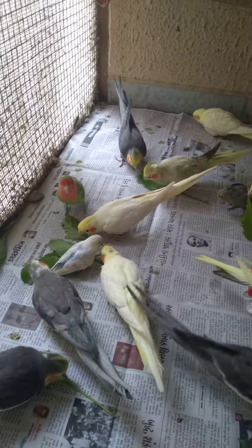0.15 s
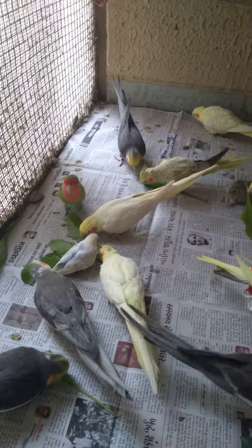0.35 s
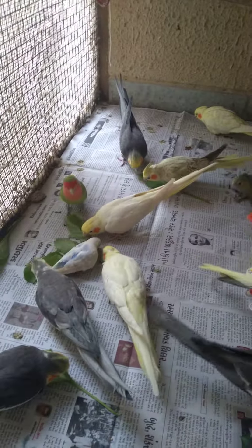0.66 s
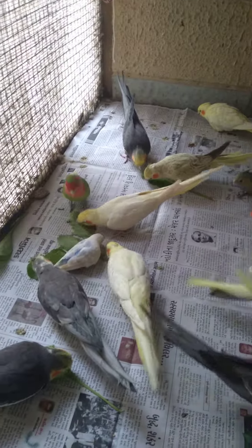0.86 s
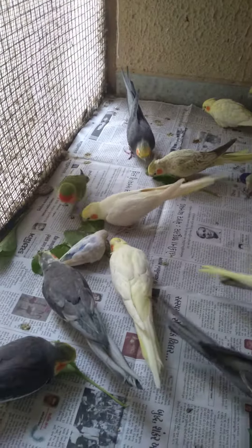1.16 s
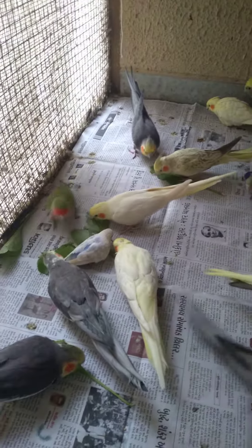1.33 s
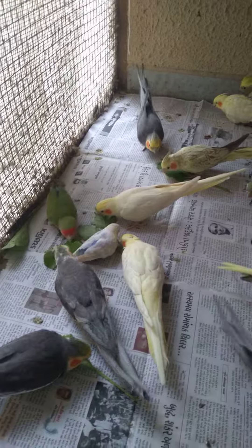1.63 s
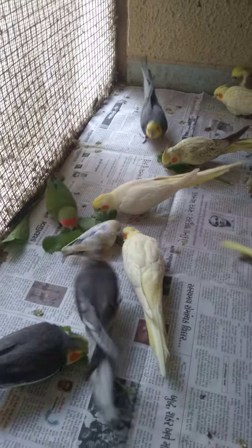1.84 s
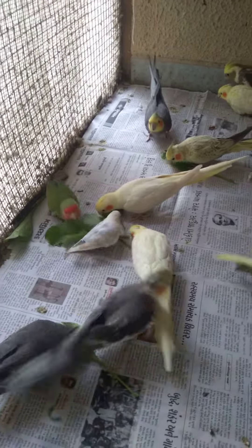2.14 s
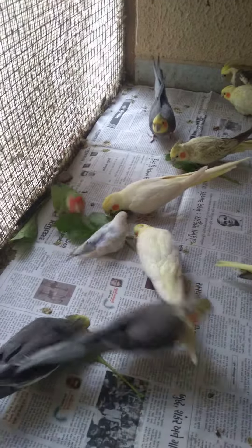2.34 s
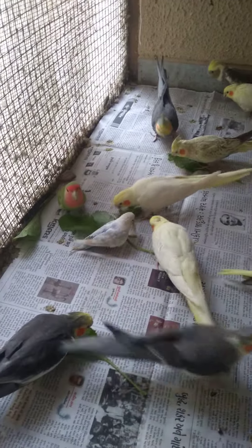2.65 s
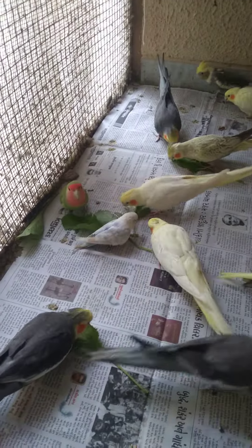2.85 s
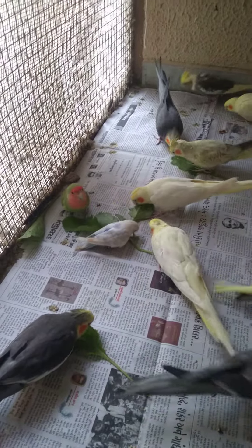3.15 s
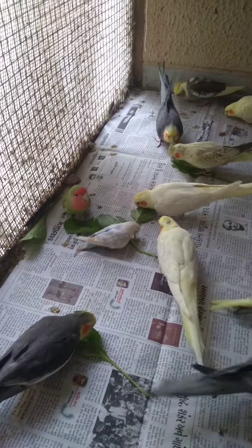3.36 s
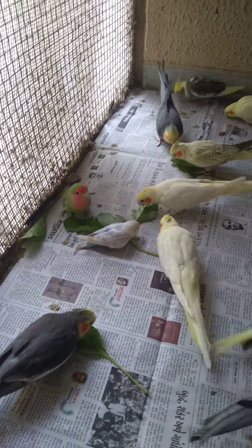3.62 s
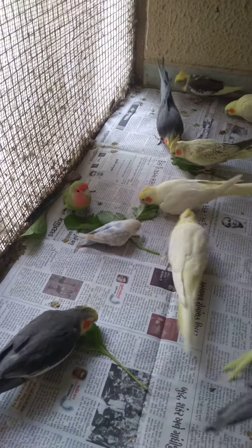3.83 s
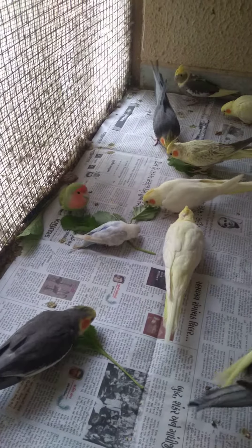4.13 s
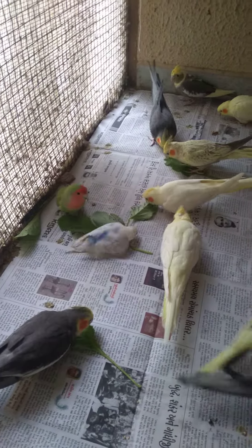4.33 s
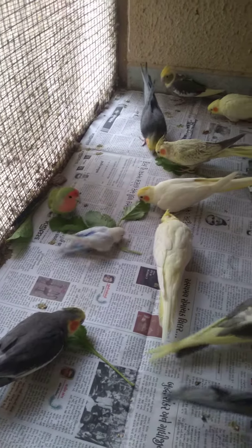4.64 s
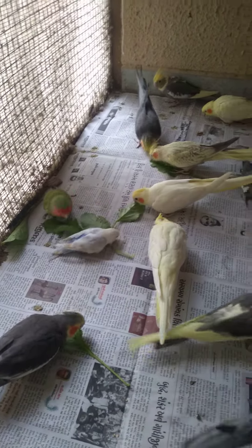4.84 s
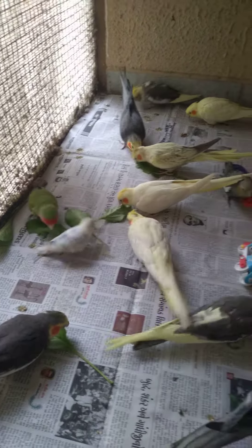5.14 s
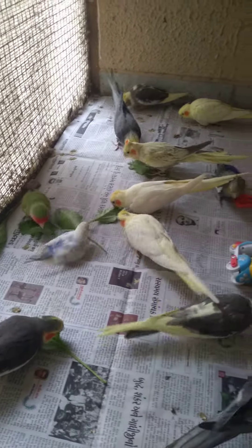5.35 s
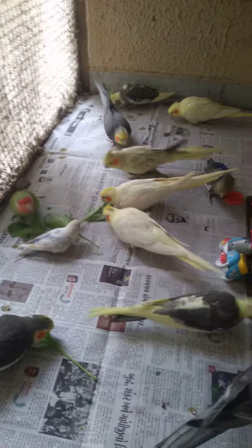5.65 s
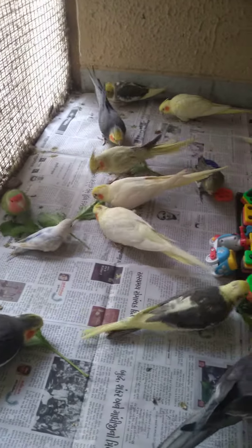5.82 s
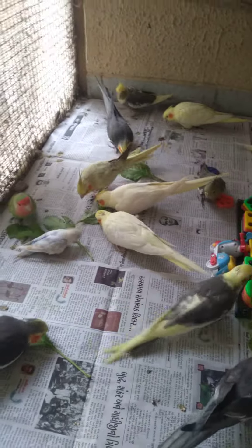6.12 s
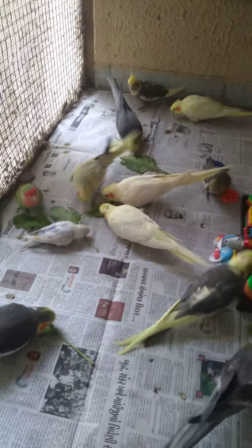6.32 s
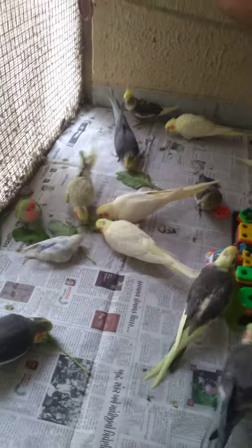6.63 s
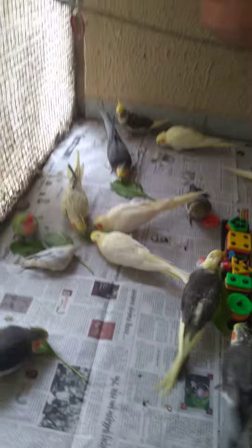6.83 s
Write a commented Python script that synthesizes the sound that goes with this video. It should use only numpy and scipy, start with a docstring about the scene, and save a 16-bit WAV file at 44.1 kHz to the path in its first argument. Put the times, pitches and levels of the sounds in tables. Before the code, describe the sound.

Close beak snips and papery rustling from feeding cockatiels in a hard-walled aviary, broken by brief bird calls and hollow floor knocks.

```python
"""A flock of small parrots feeds in a hard-walled aviary, close to the stereo microphone, for about 7 s.
Throughout, beaks snip leaves in noise bursts, claws crinkle paper in noise grains; a suppressor dulls the gaps.
A voice model of gliding tone and rasp gives an arched screech at once, chirps from 1 s, a harsh squawk at 2.4 s.
Knocks ring the hollow floor's modes, hardest near 3.7 and 4.1 s; at 6.3 s a whistle climbs in steps.
Under it all lie shaped noise for a deep outdoor rumble and faint air, and sines for a motor's hum."""
import sys
import numpy as np
from scipy import signal
from scipy.fft import rfft, irfft, next_fast_len
from scipy.io import wavfile
from scipy.ndimage import uniform_filter1d, map_coordinates

SR = 44100
rng = np.random.default_rng(int(sys.argv[2]) if len(sys.argv) > 2 else 0)


def dump(signal):
    """Clip the signal to [-1, 1] and save it as 16-bit WAV at the path in sys.argv[1]."""
    limited = np.clip(np.atleast_2d(signal).T, -1, 1)
    pcm = np.round(limited * 32767).astype(np.int16)
    wavfile.write(sys.argv[1], SR, pcm)


N = 307818  # length in samples


def amp(db):
    """Decibels to gain."""
    return 10 ** (np.asarray(db) / 20)


def unit(x):
    """Scale to rms 1."""
    return x / np.sqrt(np.mean(x ** 2) + 1e-20)


def along(points, hz):
    """Read (f/Hz, value) points at the frequencies hz, on a log axis."""
    f, value = np.transpose(points)
    return np.interp(np.log(hz + 1), np.log(f + 1), value)


def curves(rows, t):
    """Each column after the time, read at the times t."""
    times, *columns = np.transpose(rows)
    return [np.interp(t, times, column) for column in columns]


def wobble(rate, size):
    """A smooth random curve, rate knots a second."""
    knots = rng.standard_normal(int(size * rate / SR) + 4)
    return map_coordinates(knots, [np.arange(size) * rate / SR])


def filtered(x, response):
    """x times a response of frequency."""
    size = x.shape[-1]
    padded = next_fast_len(size + 4096)
    spectrum = rfft(x, padded) * response(np.fft.rfftfreq(padded, 1 / SR))
    return irfft(spectrum, padded)[..., :size]


def coloured(x, spectrum):
    """x through a spectrum, at rms 1."""
    return unit(filtered(x, lambda hz: amp(along(spectrum, hz))))


def pair(size, side_db):
    """Two channels of white noise that share a common part."""
    mid, side = rng.standard_normal((2, size))
    side = amp(side_db) * side
    return unit(np.array([mid + side, mid - side]))


def placed(x, pan_db, lag):
    """Louder on the left by pan_db and earlier there by lag samples."""
    sign = np.array([[.5], [-.5]])
    return filtered(x, lambda hz: amp(sign * pan_db) * np.exp(2j * np.pi * hz * sign * lag / SR))


def add(track, s, x):
    """Mix x into the track from s seconds on."""
    start = max(round(s * SR), 0)
    part = x[:, :max(N - start, 0)]
    track[:, start:start + part.shape[1]] += part


def grains(rate, spread_db, life):
    """Envelope of tiny fractures, rate a second, each dying over life seconds, a few much larger than the rest."""
    chance = rng.random(N)
    size = np.minimum(rng.exponential(size=N), 3.5)
    energy = (chance < rate / SR) * amp(spread_db * size) ** 2
    decaying = signal.lfilter([1], [1, -np.exp(-2 / (life * SR))], energy)
    return unit(np.sqrt(decaying))


# how long the aviary walls ring: (f/Hz, t60/s)
WALL_RING = [(200, .35), (1000, .42), (2600, .35), (4000, .38), (8000, .34), (15000, .2)]


def aviary(x, wet_db):
    """Direct sound plus the walls' answer: stereo noise dying at its own rate in each band, new on every call."""
    hz, t, bands = signal.stft(pair(SR // 2, side_db=1.5), SR, nperseg=256)
    decay = amp(-60 * t / along(WALL_RING, hz)[:, None])
    onset = 1 - np.exp(-t / 0.00043)
    tail = signal.istft(bands * decay * onset, SR, nperseg=256)[1]
    out = amp(wet_db) * signal.fftconvolve(x, tail / np.linalg.norm(tail[0]), axes=1)
    out[:, :x.shape[1]] += x
    return out


# the loudest snips of beaks and claws: (t/s, nominal direct peak level/dB, f/Hz, left-right level/dB)
SNIPS = [(.1099, -31, 3700, -4.5), (.2674, -43.5, 4050, 5.5), (.3947, -39.5, 8100, 1.5),
         (.4236, -40, 2460, 4.5), (.7789, -49, 5430, 10), (1.1761, -42.5, 2060, -2),
         (1.253, -40.5, 4350, -4), (1.398, -42, 5700, -1), (1.5075, -38, 3550, -3.5),
         (1.6312, -45, 3340, 6), (1.8453, -47.5, 4920, -1), (1.904, -44.5, 2010, 0),
         (2.0027, -40.5, 4580, 6), (2.0835, -31.5, 5870, 1.5), (2.2322, -39.5, 7290, -2),
         (2.2865, -40.5, 4870, 7), (2.39, -39.5, 6050, 1), (2.6432, -38, 5230, 1), (2.6967, -42.5, 7900, 8),
         (2.7111, -41, 6400, 11), (2.786, -43, 4640, 4), (3.0045, -45.5, 4840, 5.5), (3.039, -44, 3930, 12),
         (3.5306, -40.5, 7500, 3.5), (3.6992, -32.5, 2630, 3.5), (3.8385, -38.5, 3150, 4),
         (3.8726, -35, 2620, 4), (4.0488, -37.5, 2600, 4), (4.08, -34.5, 2700, -5), (4.1894, -37, 8000, 4),
         (4.3934, -41, 8720, -5), (4.4197, -38, 6400, 5.5), (4.4472, -35, 8300, 0.5),
         (4.6432, -33.5, 4900, -.5), (4.6494, -36, 3330, -3.5), (4.7522, -35, 3390, -1),
         (4.796, -37.5, 8700, 0), (4.8868, -34.5, 9060, -2), (4.8933, -36.5, 3900, -2),
         (5.3776, -41, 7400, 5.5), (5.5267, -42.5, 7800, 4), (5.596, -42.5, 3990, -1),
         (5.6548, -45.5, 8900, -6), (5.7335, -33, 4500, 3), (5.7934, -38.5, 4480, 1),
         (6.502, -39.5, 2270, -1), (6.8127, -38, 3870, 6)]
# spectrum of a beak snip, before its own ring: (f/Hz, relative level/dB)
BEAK_SPECTRUM = [(300, -10), (1500, -6), (3000, -1.5), (6000, 2.5), (9000, 4), (10800, -10), (13000, -14.5),
                 (16000, -26.5)]


def snips():
    """A leaf gives way in one sharp snap and a few smaller tears, ringing around its own pitch."""
    out, t = np.zeros((2, N)), np.arange(SR // 25) / SR
    for s, db, pitch_hz, pan_db in [*SNIPS, *nibbles(count=32)]:
        after = t - rng.uniform(0.0053, 0.0056, (3, 1))
        tears = np.sum((after > 0) * np.exp(-abs(after) / .0008) * rng.random((3, 1)), axis=0)
        snap = (t / .001) ** 2 * np.exp(-t / .0008) * 3 + .2 * tears
        ring = lambda hz: .4 + 1 / (1 + ((hz - pitch_hz) / 700) ** 2)
        # a high-pitched snap is also crisper in the top treble
        crisp = lambda hz: amp(3 * np.log2(abs(pitch_hz) / 4500) * hz / 12000)
        response = lambda hz: amp(along(BEAK_SPECTRUM, hz)) * ring(hz) * crisp(hz)
        burst = filtered(pair(len(t), side_db=-1.0) * snap, response)
        # the level is set on the first 5 ms
        burst *= amp(db) / (2.09 * np.std(burst[:, :SR // 200]))
        add(out, s, aviary(placed(burst, pan_db, lag=pan_db * .5), wet_db=-5))
    return out


# faint nibbling, mean and standard deviation: (nominal direct peak level/dB, f/Hz, left-right level/dB)
NIBBLE, NIBBLE_SPREAD = (-49, 5100, 4), (2, 1114, 4)


def nibbles(count):
    """Faint snips scattered by chance, as rows like those of SNIPS."""
    times = rng.random(count) * N / SR
    return np.column_stack([times, rng.normal(NIBBLE, NIBBLE_SPREAD, (count, 3))])


# stretches where the recorder's noise suppressor stays open:
# (start t/s, stop t/s, rustle reference level/dB)
OPEN_STRETCHES = [(-.02, 0.323, -64.5), (0.375, 0.582, -66.5), (.665, 0.826, -73.5), (0.882, 0.992, -68.5),
                  (1.09, 1.369, -67), (1.395, 1.676, -65), (1.737, 1.825, -68.5), (1.848, 2.349, -64.5),
                  (2.389, 2.818, -66.5), (2.861, 2.937, -68), (2.959, 3.641, -66.5), (3.677, 4.002, -65),
                  (4.046, 5.034, -64), (5.065, 5.278, -66.5), (5.327, 5.439, -68), (5.524, 5.958, -65),
                  (5.982, 7.02, -65.5)]
# swells of rustle on top, scuffles except the first, at 0.13 s, which comes with the screech: (t/s at the top,
# time/s from there to 1/e of the power, # rustle reference level/dB, floor shuffle level/dB)
SCUFFLES = [(.13, 0.051, -55, -66), (.425, 0.02, -54, -57.5), (2.05, 0.044, -59.5, -64.5),
            (2.55, 0.1, -55.5, -58), (3.17, 0.068, -57, -64), (3.36, .045, -56.5, -60.5),
            (3.88, 0.0276, -56.5, -53), (4.2, 0.061, -56, -56.5), (4.49, 0.04, -60, -56),
            (4.665, 0.022, -54.5, -57), (4.9, 0.0219, -55, -59.5), (5.6, 0.088, -63, -67),
            (6.06, 0.023, -61.5, -57), (6.35, 0.074, -63.5, -56)]
# spectra of crackling paper, of sliding paper and leaves, and of feet on the floor: (f/Hz, relative level/dB)
CRACKLE_SPECTRUM = [(500, -24), (1200, -4), (2200, -2), (4200, -1.5), (6000, -1), (9000, -1),
                    (10500, -11.5), (13000, -15), (16000, -17)]
SWISH_SPECTRUM = [(500, -19), (1200, -13), (2200, -1.5), (4200, 2.5), (6000, -3.5), (9000, -1.5),
                  (10500, -14), (13000, -21.5), (16000, -33)]
SHUFFLE_SPECTRUM = [(120, -26), (300, -2), (650, 1.5), (1000, -1), (1500, -3), (2200, -3.5), (4000, -4.5),
                    (9000, -71.5)]
FEET_DB = -2.5  # steady shuffling on the floor, dB relative to the stretch's reference level


def rustle():
    """Paper and leaves crackle and slide under feet that scuff the floor: steady in a stretch, swelling in scuffles."""
    t = np.arange(N) / SR
    steady_db, = curves([(s, db) for start, stop, db in OPEN_STRETCHES for s in (start, stop)], t)
    # paper and feet are powers, so that the swells add
    paper, feet = amp(steady_db) ** 2, amp(steady_db + FEET_DB) ** 2
    for s, width, paper_db, feet_db in SCUFFLES:
        swell = np.exp(-((t - s) / width) ** 2)
        paper = paper + swell * amp(paper_db) ** 2
        feet = feet + swell * amp(feet_db) ** 2
    restless_db = 1.3 * wobble(13, N)
    crackling = pair(N, side_db=-0.5) * grains(rate=140, spread_db=6, life=0.0034)
    crackle = coloured(crackling, CRACKLE_SPECTRUM) * amp(restless_db - 2.0)
    sliding = pair(N, side_db=0.1) * (grains(rate=900, spread_db=5.5, life=0.0049) + 0.81)
    swish = coloured(sliding, SWISH_SPECTRUM) * amp(restless_db + 4.0)
    scuffing = pair(N, side_db=-1.0) * (grains(rate=90, spread_db=5.5, life=0.0054) + 0.73)
    shuffle = coloured(scuffing, SHUFFLE_SPECTRUM)
    return placed((crackle + swish) * np.sqrt(paper), pan_db=1.2, lag=0.63) + shuffle * np.sqrt(feet)


# blows on the floor: (t/s, nominal direct peak level/dB of the blow, upper limit f/Hz: low for a soft foot)
KNOCKS = [(.111, -48, 2485), (1.177, -44, 2000), (2.09, -47.5, 300), (3.199, -39.5, 2000),
          (3.38, -47.5, 2000), (3.675, -45, 2500), (3.6995, -27, 2960), (3.838, -37.5, 3000),
          (3.874, -37.5, 2500), (4.0582, -27.5, 2280), (4.417, -51, 1980), (4.492, -49, 1800),
          (4.887, -50.5, 1490), (5.08, -55, 900), (5.528, -48.5, 1490), (5.618, -46, 860),
          (5.721, -44.5, 1190), (5.912, -46.5, 700), (5.982, -48, 550), (6.066, -49, 900),
          (6.812, -47, 280)]
# each blow is a touch, the main contact and two rebounds:
# (t/s from the main contact, level/dB relative to the blow, factor on the floor's t60)
CLATTER = [(-.006, -10, .6), (0, 0.5, 0.59), (.009, -10, 0.94), (.022, -11, 0.65)]
# modes of the hollow floor: (f/Hz, mean relative level/dB, t60/s before the contact's factor)
FLOOR_MODES = [(236, -21.5, 0.11), (334, -20, 0.11), (475, -12.5, 0.15), (540, -9, 0.11), (681, -7, 0.11),
               (792, -9, 0.05), (938, -7.5, 0.13), (1228, -1, 0.0402), (1308, -8, 0.076),
               (1393, 3.5, 0.051), (1534.6, 0, 0.037), (1600, -4, 0.065), (1804, -3.5, 0.072),
               (2280, -22.5, 0.033), (3080, 3.5, 0.043)]


def knocks():
    """Each contact rings the floor's modes at new strengths, over a short dull push; soft ones lack the highs."""
    out, t = np.zeros((2, N)), np.arange(SR // 5) / SR
    hz, mode_db, t60 = np.transpose(FLOOR_MODES)[:, :, None]
    contacts = [(s + delay, db + step_db, length, limit_hz)
                for s, db, limit_hz in KNOCKS for delay, step_db, length in CLATTER]
    for s, db, length, limit_hz in contacts:
        strength = amp(mode_db + rng.normal(0, 1.4, hz.shape)) * rng.choice([-1, 1], hz.shape)
        modes = strength * np.sin(2 * np.pi * hz * t) * amp(-60 * t / (t60 * length))
        ring = np.sum(modes, axis=0)
        push = coloured(rng.standard_normal(len(t)) * np.exp(-t / 0.0052), SHUFFLE_SPECTRUM)
        blow = filtered(unit(ring) + 0.24 * push, lambda f: 1 / (1 + (f / limit_hz) ** 4))
        # the level is set on the first 10 ms
        blow *= amp(db) / (3.27 * np.std(blow[:SR // 100]))
        add(out, s, aviary(placed(blow, pan_db=-1.0, lag=-4.5), wet_db=-1.0))
    return out


# three long calls: (t/s, f/Hz, level/dB before the spot's gain, roughness 0-1, octave overtone level/dB);
# the whistle holds each pitch to the next row
SCREECH = [(.054, 2700, -54, .2, -20), (.068, 2830, -43, .45, -20), (.078, 3580, -38, .35, -14),
           (.093, 3650, -34, .2, -14), (.11, 3550, -40, .4, -16), (.122, 3100, -42, .55, -18),
           (.145, 2950, -43.5, .55, -16), (.19, 3050, -50, .6, -12)]
SQUAWK = [(2.405, 2300, -59, .9, 4), (2.427, 2150, -49, .8, 8), (2.45, 2250, -52, .85, 6),
          (2.47, 2150, -47.5, .75, 6), (2.492, 2100, -43.5, .6, 7), (2.513, 2230, -44, .6, 7),
          (2.526, 2530, -38, .5, -4), (2.552, 2640, -35, .35, -11), (2.572, 2750, -47, .35, -9)]
WHISTLE = [(6.268, 1650, -58, .3, -3), (6.281, 1440, -51.5, .1, -3), (6.326, 1630, -42.5, .12, -9),
           (6.341, 2000, -40, .35, -15), (6.361, 2390, -38, .3, -23), (6.408, 2575, -34.5, .18, -16),
           (6.432, 2575, -31.5, .12, -16), (6.447, 2520, -46, .2, -22)]
# where each comes from: (gain/dB, left-right level/dB, samples by which the left channel leads)
SCREECH_SPOT, SQUAWK_SPOT, WHISTLE_SPOT = (0.1, -1, 1.7), (0.3, -.3, -4.5), (-0.24, 2.03, -5.5)


def long_calls():
    """An arched screech, a harsh squawk that clears as it rises, and a whistle that jumps from note to note."""
    out = np.zeros((2, N))
    calls = [(SCREECH, SCREECH_SPOT, False), (SQUAWK, SQUAWK_SPOT, False), (WHISTLE, WHISTLE_SPOT, True)]
    for call, spot, stepped in calls:
        times, notes_hz = np.transpose(call)[:2]
        t = np.arange(times[0], times[-1], 1 / SR)
        pitch_hz, db, rough, octave_db = curves(call, t)
        if stepped:
            held_hz = notes_hz[np.searchsorted(times, t, "right") - 1]
            pitch_hz = uniform_filter1d(held_hz, size=SR // 200)  # 5 ms slide
        add(out, times[0], syrinx(pitch_hz, db, rough, octave_db, spot))
    return out


# short chirps, each one glide:
# (t/s, length/s, first f/Hz, last f/Hz, top level/dB before the spot's gain, roughness 0-1)
CHIRPS = [(1.09, 0.057, 5225, 4400, -59, 0.32), (1.135, 0.047, 3050, 2738, -60, 0.53),
          (1.507, 0.09, 3440, 3105, -52, 0.43), (1.9, .1, 2191, 2042, -65, .4),
          (2.15, 0.0565, 3400, 3107, -54.5, .25), (3.088, 0.077, 5700, 4800, -48.5, .85),
          (3.149, 0.067, 4270, 3500, -46, .75), (3.304, .055, 4820, 5310, -45, 0.74),
          (3.341, .06, 5310, 3895, -48.5, .9), (3.425, .05, 4000, 3190, -50.5, 0.81),
          (4.545, .045, 3150, 3243, -55, .15), (4.745, 0.047, 2670, 3900, -54.5, 0.55),
          (5.069, .12, 4280, 3390, -60.5, .45), (5.208, .045, 2942, 2531, -59, 0.25),
          (6.104, 0.0545, 3770, 2915, -55, 0.41)]
# where they come from: (gain/dB, left-right level/dB, samples by which the left channel leads)
CHIRP_SPOT = (0.2, 1.5, 3.24)
# loudest this share of the way through; level at both ends, dB relative to the top; octave overtone, dB
CHIRP_TOP, CHIRP_EDGE_DB, CHIRP_OCTAVE_DB = 0.41, -6, -25


def chirps():
    """Each chirp slides evenly from one pitch to another while it swells and fades."""
    out = np.zeros((2, N))
    for s, length, first_hz, last_hz, db, rough in CHIRPS:
        u = np.linspace(0, 1, round(length * SR))
        swell_db = np.interp(u, [0, CHIRP_TOP, 1], [CHIRP_EDGE_DB, 0, CHIRP_EDGE_DB])
        pitch_hz = first_hz * (last_hz / first_hz) ** u
        add(out, s, syrinx(pitch_hz, db + swell_db, rough, CHIRP_OCTAVE_DB, CHIRP_SPOT))
    return out


# resonances of the throat, heard in the rasp: (f/Hz, relative level/dB)
THROAT_SPECTRUM = [(800, -22.5), (1600, -9), (2300, -3.5), (3200, 4), (4500, 2), (6000, 0.5), (9000, -13),
                   (11000, -42)]
# pitch unsteadiness of a fully rough voice, as a share of the pitch
FAST_FLUTTER, SLOW_FLUTTER = .1, .06


def syrinx(pitch_hz, db, rough, octave_db, spot):
    """A gliding tone with overtones in the aviary; when forced, pitch and strength flutter and it rasps."""
    size, rough = len(pitch_hz), np.clip(rough, 0, 1)
    gain_db, pan_db, lag = spot
    flutter = FAST_FLUTTER * wobble(1100, size) + SLOW_FLUTTER * wobble(200, size)
    phase = 2 * np.pi * np.cumsum(pitch_hz * (1 + rough * flutter)) / SR
    overtones = np.sin(2 * phase) + amp(-21) * np.sin(3 * phase) + amp(-13) * np.sin(4 * phase)
    tone = np.sin(phase) + amp(octave_db) * overtones
    tone = filtered(tone, lambda hz: 1 / (1 + (hz / 9000) ** 16))
    # chaotic vibration: noise in the throat's resonances, strongest when the overtones are
    rasp_gain = .85 * rough ** 1.8 * np.hypot(1, amp(octave_db))
    rasp = rasp_gain * coloured(rng.standard_normal(size), THROAT_SPECTRUM)
    strength = amp(db + gain_db + 4 * rough * wobble(300, size))
    voice = (tone + rasp) * strength * signal.windows.tukey(size, .12)
    return aviary(placed(voice, pan_db, lag), wet_db=0.1)


SUPPRESSOR_DB, FADE_S = -22.5, 0.022  # treble gain when closed, dB; time it takes to close, s


def suppressor(x):
    """The recorder's noise suppressor turns x's treble down between the open stretches, at times set by the table."""
    t = np.arange(N) / SR
    opened = 0
    for start, stop, _ in OPEN_STRETCHES:
        # it opens twice as fast as it closes
        rise = 1 + 2 * (t - start) / FADE_S
        fall = .5 + (stop - t) / FADE_S
        opened = opened + np.clip(np.minimum(rise, fall), 0, 1)
    bass = filtered(x, lambda hz: 1 / (1 + (hz / 550) ** 4))
    return bass + (x - bass) * amp(SUPPRESSOR_DB * (1 - np.minimum(opened, 1)))


# spectra of the deep outdoor rumble and of the faint air: (f/Hz, relative level/dB)
DEEP_SPECTRUM = [(10, -1), (24, 4.5), (32, -14.5), (40, 1.5), (52, -7), (66, -7.5), (80, -16), (100, -21),
                 (130, -20), (165, -19.5), (220, -26.5), (300, -38), (600, -69.5)]
AIR_SPECTRUM = [(130, -17.5), (220, -3.5), (350, -4), (480, -6), (750, -14.5), (1100, -23.5), (1800, -30),
                (4000, -42), (9000, -55.5), (16000, -58)]
# partials of the hum: (f/Hz, mean rms level/dB)
HUM = [(120.5, -69), (301, -76)]


def background():
    """Deep outdoor rumble and faint air as shaped noise; a motor's hum as sines of wavering level and phase."""
    deep = placed(coloured(pair(N, side_db=-9.5), DEEP_SPECTRUM), pan_db=4.5, lag=0.88) * amp(-46.5)
    air = coloured(pair(N, side_db=-7.5), AIR_SPECTRUM) * amp(-66.5)
    t = np.arange(N) / SR
    hum = 0
    for hz, db in HUM:
        level = np.sqrt(2) * amp(db + 1.2 * wobble(2.7, N))
        hum = hum + level * np.sin(2 * np.pi * hz * t + 1.28 * wobble(7.4, N))
    return deep + air + hum


def scene():
    """The feeding flock through the suppressor, over the untouched background."""
    flock = snips() + rustle() + knocks() + long_calls() + chirps()
    return suppressor(flock) + background()


TOP_HZ = 15950  # band limit of the recorder


def record(dry):
    """The recorder keeps nothing above its band limit."""
    return filtered(dry, lambda hz: hz < TOP_HZ)


dry = scene()
out = record(dry)
dump(out)
```